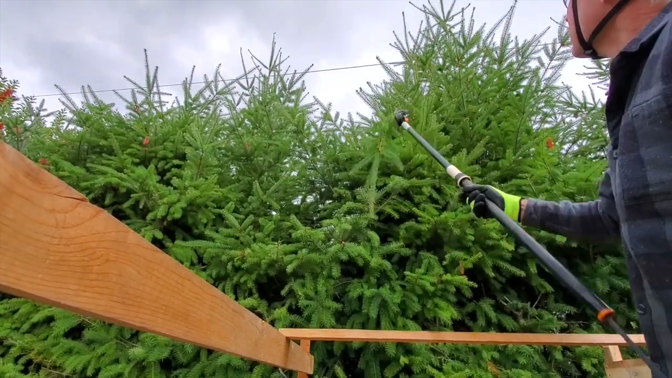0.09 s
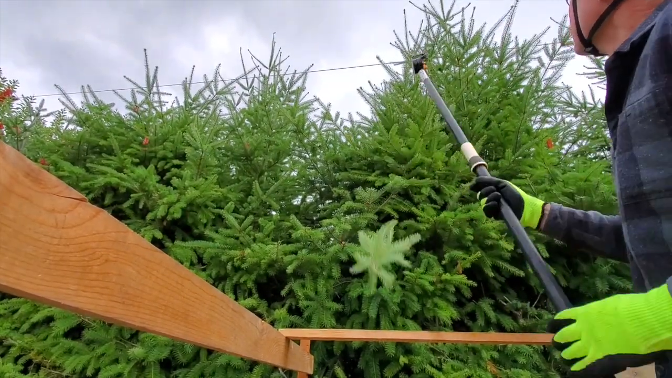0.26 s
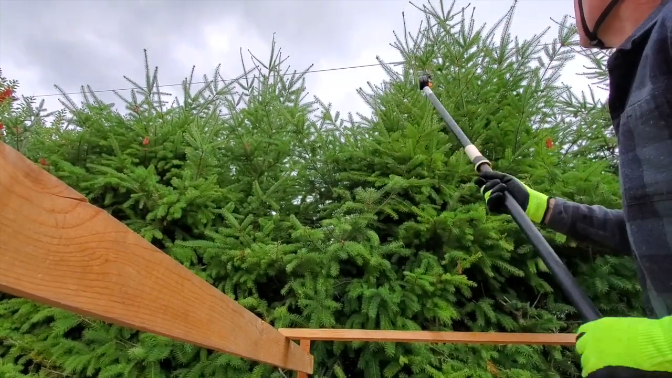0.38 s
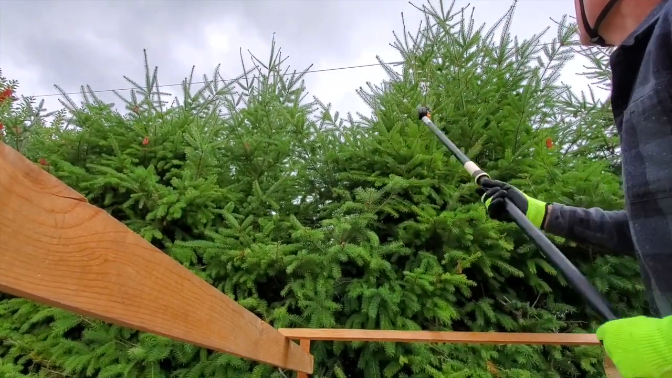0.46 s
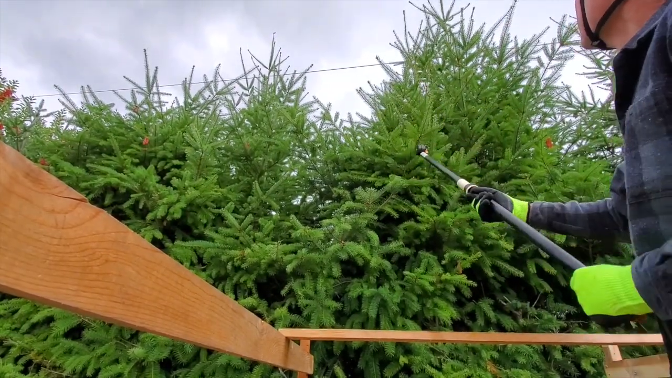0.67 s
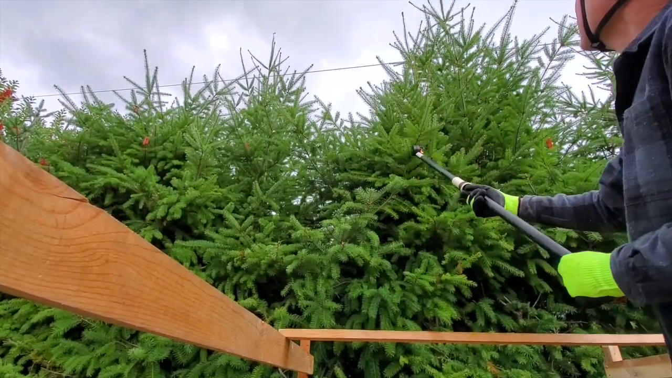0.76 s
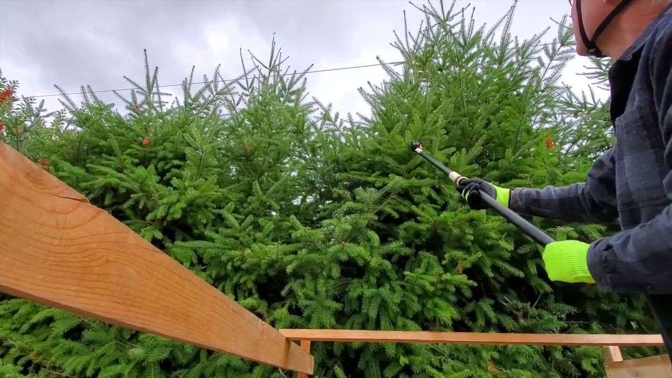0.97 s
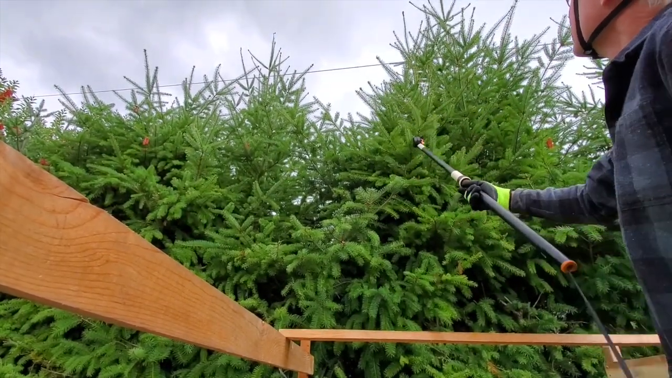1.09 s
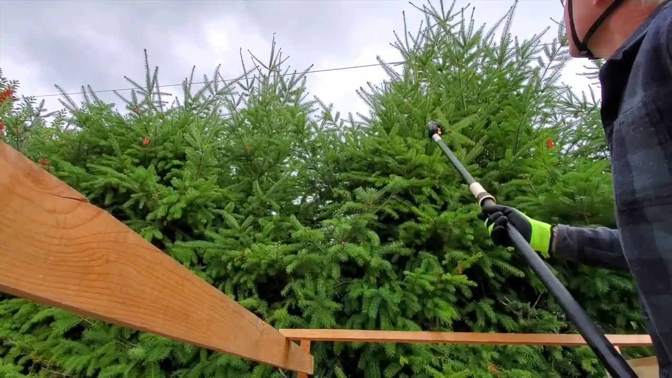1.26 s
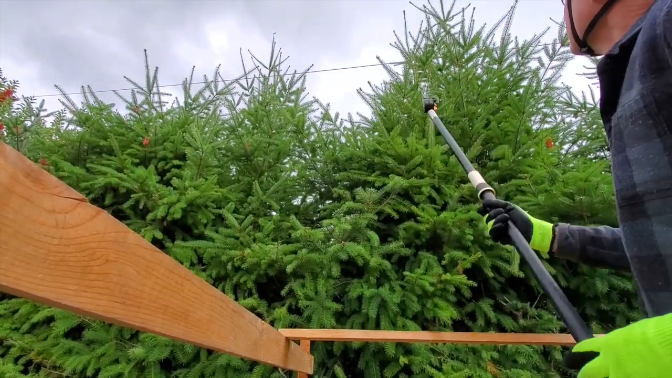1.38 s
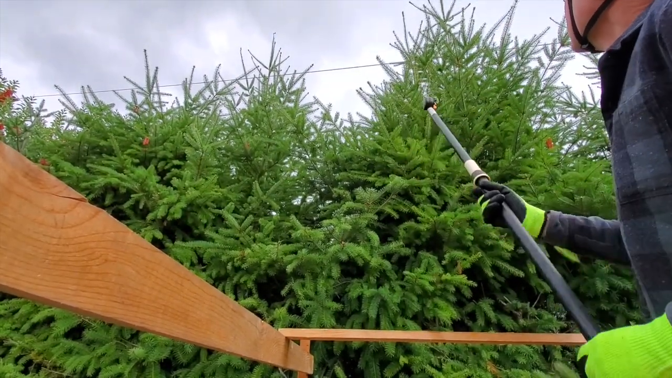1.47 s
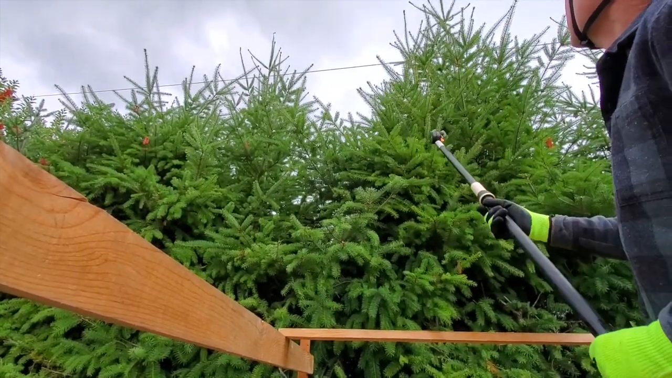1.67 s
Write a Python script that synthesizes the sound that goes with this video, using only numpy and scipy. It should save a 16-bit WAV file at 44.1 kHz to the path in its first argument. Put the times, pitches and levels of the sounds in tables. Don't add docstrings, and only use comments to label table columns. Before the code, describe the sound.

Close stereo phone pickup in a garden hedge: pruner blade cracks a twig, metal head clanks back and jingles, gloves shift, pole rattles, blade snaps again, pole butt taps a plank; quiet rumble and faint bird twitters behind.

```python
import sys
import numpy as np
from scipy import signal
from scipy.fft import rfft, irfft
from scipy.io import wavfile

SR = 44100
rng = np.random.default_rng(int(sys.argv[2]) if len(sys.argv) > 2 else 0)


def to_wav(s):
    ch = np.atleast_2d(s).T
    pcm = np.round(np.clip(ch, -1, 1) * 32767)
    wavfile.write(sys.argv[1], SR, pcm.astype(np.int16))


def elevation(decibels):
    levels = np.asarray(decibels, float)
    return 10 ** (levels / 20)


N = 74970
LEFT_LAG = 5


def in_time(rows):
    return np.interp(np.arange(N) / SR, *np.transpose(rows))


def at_hz(points, hz):
    table_hz, values = np.transpose(points)
    return np.interp(np.log(hz), np.log(table_hz), values)


def rms_one(x):
    return x / np.sqrt(np.mean(x ** 2))


def drift(rate):
    r = np.exp(-80 * np.pi * rate / SR)
    noise = rng.standard_normal(N // 40 + 2002)
    slow = signal.lfilter([1], [1, -2 * r, r * r], noise)[2000:]
    return np.interp(np.arange(N) / 40, np.arange(len(slow)), rms_one(slow))


def coloured(x, spectrum, balance=None):
    hz = np.maximum(np.arange(1025) * SR / 2048, 10)
    lean = 0 if balance is None else at_hz(balance, hz) / 2
    level = np.log(elevation(at_hz(spectrum, hz) + lean * np.array([[1], [-1]])))
    cep = irfft(level)
    cep[:, 1:1024] *= 2
    cep[:, 1025:] = 0
    kernel = irfft(np.exp(rfft(cep)))
    kernel = kernel / np.sqrt(np.mean(kernel ** 2) * 2048)
    return signal.fftconvolve(x, kernel, axes=1)[:, :N]


def sides(x, pan_db, lag=LEFT_LAG):
    left, right = np.broadcast_to(x, (2, np.shape(x)[-1]))
    return np.array([elevation(pan_db / 2) * np.roll(left, lag), elevation(-pan_db / 2) * right])


def bursts(rows, pan_db, alike=0.56):
    t, out = np.arange(N) / SR, 0
    common, left, right = rng.standard_normal((3, N))
    crackle = alike * sides(common, 0) + np.sqrt(1 - alike ** 2) * np.array([left, right])
    for s, db, decay in rows:
        age = np.maximum(t - s, 0)
        rise = 1 - np.exp(-age / (decay * 0.46))
        out = out + elevation(db - 0.5) * rise * np.exp(-age / decay)
    return sides(out, pan_db) * crackle


def struck(modes, blows, spread_db, pan_db, soft_hz, lag=LEFT_LAG):
    contact_s = 0.0015
    out = np.zeros((2, N))
    s, db = np.transpose(blows)
    for hz, level_db, t60 in modes:
        clicks = np.full((2, N), 1e-18)
        shared, left, right, late = rng.standard_normal((len(s), 4)).T
        at = ((s + contact_s * np.abs(late)) * SR).astype(int)
        chance_db = spread_db * (shared + np.array([left, right]) / 2)
        clicks[:, at] = np.sign(late) * elevation(db + level_db + chance_db)
        r, w = elevation(-60 / (t60 * SR)), 2 * np.pi * hz / SR
        out += signal.lfilter([0, np.sin(w)], [1, -2 * r * np.cos(w), r * r], clicks)
    out = signal.sosfilt(signal.butter(2, soft_hz, "high", fs=SR, output="sos"), out)
    return sides(out, pan_db, lag)


def banded(spectrum, low_hz, count, patchy_db, rate):
    # frequency in Hz, likeness of left and right from 0 to 1
    likeness = [(60, 0.18), (130, 1), (290, 1), (640, 0.88), (1500, 0.58), (3100, 0.013)]
    out, together = 0, drift(rate)
    edges = low_hz * 2 ** (np.arange(count + 1) / 2)
    white = rng.standard_normal((2, 2, N))
    for k, (low, high) in enumerate(zip(edges, edges[1:])):
        band = signal.butter(2, [low, min(high, .45 * SR)], "band", fs=SR, output="sos")
        mid, side = signal.sosfilt(band, white[k % 2])
        alike = at_hz(likeness, np.sqrt(low * high))
        stereo = np.sqrt(1 + alike) * mid + np.sqrt(1 - alike) * side * [[1], [-1]]
        out = out + elevation(patchy_db * (.5 * together + drift(rate))) * stereo
    return rms_one(coloured(out, spectrum))


def traffic():
    # frequency in Hz, level in dB per Hz
    rumble = [(25, -25.5), (58, -33), (85, -2.5), (240, -7.5), (540, -17), (1500, -23.5), (2600, -27.5),
              (4500, -41.5)]
    # frequency in Hz, width in Hz, level in dB
    engines = [(134.5, 14, -68.5), (242, 14, -69)]
    out = banded(rumble, 19.9, count=16, patchy_db=1.7, rate=5) * elevation(-61.5)
    for hz, width_hz, db in engines:
        r = np.exp(-np.pi * width_hz / SR)
        noise = rng.standard_normal((2, N + SR))
        note = signal.lfilter([1, 0, -1], [1, -2 * r * np.cos(2 * np.pi * hz / SR), r * r], noise)
        mid, side = note[:, SR:]
        out = out + elevation(db) * rms_one(mid + .5 * side * [[1], [-1]])
    return out


def needle_rustle():
    # time in seconds, level in dB
    movement = [(0, -70.5), (.12, -63), (.34, -57), (.4, -71), (.44, -60.5), (.6, -70.5), (.7, -70.5),
                (.77, -68), (.86, -78), (.96, -70.5), (.995, -58), (1.03, -65), (1.095, -57.5),
                (1.16, -69.5), (1.29, -62.5), (1.46, -67), (1.51, -58.5), (1.56, -72)]
    # frequency in Hz, level in dB per Hz
    needles = [(1470, -35), (2500, -14), (3410, -34.5), (3830, -11.5), (6550, -1), (10700, -12),
               (13600, -8.5), (16000, -28)]
    return elevation(in_time(movement)) * banded(needles, 1700, count=7, patchy_db=1.5, rate=13)


def glove_grips():
    # start in seconds, peak in dB, burst decay in seconds
    grips = [
        (.03, -53, 0.14),
        (.51, -44.5, 0.036),
        (.736, -47.5, 0.012),
        (1.03, -49, 0.088),
        (1.17, -54, 0.14),
        (1.65, -56, 0.018),
    ]
    # frequency in Hz, level in dB per Hz
    friction = [(70, -15.5), (140, 3), (350, -8), (1200, -11.5), (2300, -15.5), (3200, -38)]
    return coloured(bursts(grips, pan_db=-1.5, alike=0.87), friction)


def creak_ticks():
    # start in seconds, peak in dB, burst decay in seconds
    slips = [(.1845, -35.5, 0.0011), (.1975, -37, 0.0015), (.209, -36, 0.001), (.216, -42, 0.0014),
             (.232, -46, 0.00023), (.241, -38, 0.00091), (.249, -46, 0.00052), (.468, -40, 0.0025),
             (1.286, -46, 0.0077), (1.3295, -25, 0.00084), (1.3635, -28, 0.00089), (1.414, -23.5, 0.002),
             (1.422, -29, 0.0032), (1.524, -48, 0.0019), (1.606, -47, 0.0054)]
    # frequency in Hz, level in dB per Hz
    tick_colour = [(300, -28.5), (2500, -12.5), (3600, -9.5), (6300, -1.5), (10500, -21.5), (13000, -9),
                   (14500, -11.5), (16500, -38.5)]
    return coloured(bursts(slips, pan_db=-1.5), tick_colour)


def part_pings():
    # start in seconds, level in dB, frequency in Hz, t60 in seconds, left-right in dB
    parts = [(.185, -40, 7200, 0.014, 5), (.1855, -47, 12900, .01, -14), (.1985, -51, 7000, 0.0087, -3),
             (.2165, -52, 6500, 0.0087, -2), (.2325, -22, 6800, .015, 0), (.2405, -40, 5530, 0.01, 5),
             (.249, -39, 11400, .01, -8), (.4788, -32, 8550, .04, -6), (.4835, -44.5, 1212, 0.36, -1),
             (.4835, -44, 1249, 0.16, 2), (.4858, -45, 4660, 0.021, -9), (.494, -33, 4920, 0.027, 2),
             (.505, -46, 4480, 0.027, -1), (.533, -50, 4300, 0.027, 0), (.567, -56, 4200, 0.062, -10),
             (.572, -51.5, 5000, 0.037, 7), (1.103, -34, 6600, .012, .1), (1.1095, -28, 6460, .012, 7),
             (1.1195, -40, 6650, 0.0093, 11), (1.33, -27, 10200, .01, -3), (1.3305, -19, 5800, 0.016, 2),
             (1.339, -33, 9400, 0.013, -4), (1.3632, -31, 5270, 0.013, 13), (1.415, -29, 6780, .015, 2),
             (1.4148, -34, 12900, .02, -12), (1.4225, -32.5, 12750, 0.016, -14.5),
             (1.4225, -35.5, 9560, 0.0081, -13), (1.424, -35.5, 6160, 0.024, 10),
             (1.428, -40, 6400, 0.011, 3), (1.4744, -59, 6110, .012, -2.1), (1.4779, -56, 6400, .012, -4),
             (1.4963, -46, 6550, 0.027, 4), (1.5527, -60, 5850, .012, -1.1)]
    out, t = np.zeros((2, N + SR)), np.arange(SR // 2) / SR
    for s, db, hz, t60, pan_db in parts:
        attack = np.minimum(t * hz / 3, 1)
        ring = elevation(db - 60 * t / t60) * np.sin(2 * np.pi * hz * t) * attack
        i = int(s * SR)
        out[:, i:i + len(t)] += sides(ring, pan_db)
    return out[:, :N]


def hedge(x):
    t60_s, gap_s, level_db, spread_db = 0.13, 0.0038, -11.5, 6
    t = np.arange(SR // 4) / SR
    sizes = elevation(spread_db * np.minimum(rng.exponential(1, (2, len(t))), 4))
    echoes = rng.standard_normal((2, len(t))) * sizes * elevation(-60 * t / t60_s) * (t > gap_s)
    echoes = echoes / np.sqrt(np.sum(echoes ** 2) / 2)
    return elevation(level_db) * signal.fftconvolve(x, echoes, axes=1)[:, :N]


def hollow_pole():
    # frequency in Hz, level in dB, t60 in seconds
    tube = [(350, -6, .025), (620, -7, .02), (1030, -5, .015), (1250, -3, .02), (1620, -4, .015),
            (2050, -5, .015)]
    # time in seconds, level in dB
    jolts = [
        (0.2246, -38.5),
        (0.7377, -55.5),
        (1.1084, -38),
        (1.12, -46),
        (1.3207, -33),
        (1.415, -49.5),
    ]
    return struck(tube, jolts, 0.82, pan_db=0.0, soft_hz=255.6)


def blade_ring(peaks, s, db):
    modes = [(hz, level_db, 3.55 / width_hz) for hz, width_hz, level_db in peaks]
    return struck(modes, [(s, db)], 1.5, pan_db=-3.0, soft_hz=2460)


def twig_snaps():
    # start in seconds, peak in dB, burst decay in seconds
    breaks = [
        (0.2247, -3.5, 0.0016),
        (0.2282, -20.5, 0.0014),
        (1.3203, -4.5, 0.00094),
        (1.3233, -20.5, 0.004),
    ]
    # frequency in Hz, level in dB per Hz
    snap_colour = [(200, -28), (2400, -28), (4000, -11.5), (6500, -2.5), (8500, -15.5), (11000, -12.5),
                   (13200, -7.5), (16500, -36)]
    # frequency in Hz, left-right balance in dB
    snap_balance = [(60, -1.5), (150, 5), (380, 0), (950, -0.5), (2380, -5.5), (5980, 5), (15000, -17)]
    # frequency in Hz, width in Hz, level in dB
    first_song = [(4940, 210, -12), (5360, 310, 0.5), (6580, 299, -1), (7080, 250, -8.5), (7690, 500, -8.5),
                  (8720, 420, -6), (11500, 510, -7), (13200, 530, -2.5), (14500, 490, -18)]
    # frequency in Hz, width in Hz, level in dB
    second_song = [(3460, 200, -9.5), (4560, 190, -7.5), (6580, 300, -3), (7780, 320, -23.5),
                   (9520, 440, -1.5), (11180, 240, -2.5), (13500, 390, -10), (13900, 240, -10),
                   (15100, 280, -4)]
    crack = coloured(bursts(breaks, pan_db=-2.9, alike=0.89), snap_colour, snap_balance)
    first_ring = blade_ring(first_song, breaks[0][0], -14)
    return crack + first_ring + blade_ring(second_song, breaks[2][0], -14.5)


def birds():
    # start in seconds, length in seconds, start in Hz, end in Hz, level in dB
    whistles = [(.649, .012, 7400, 8800, -72), (.665, .018, 8300, 7200, -72), (.678, .009, 6300, 6400, -69),
                (.742, .01, 7800, 7500, -70), (.759, .009, 8700, 8000, -69), (.766, .009, 7400, 7100, -68),
                (.772, .012, 9900, 9200, -69), (.766, .012, 8400, 8600, -71), (.772, .011, 3600, 3650, -71),
                (1.618, .016, 12500, 8200, -66), (1.674, .018, 6800, 11500, -67),
                (1.578, .018, 9800, 9000, -69), (1.598, .008, 9000, 12500, -68),
                (1.514, .01, 8500, 14000, -66), (.325, .012, 8500, 10000, -68)]
    out = np.zeros(N)
    for s, length, start_hz, end_hz, db in whistles:
        n, i = int(length * 1.8 * SR), int(s * SR)
        phase = 2 * np.pi * np.cumsum(np.linspace(start_hz, end_hz, n)) / SR
        note = elevation(db) * np.hanning(n) * np.sin(phase)
        out[i:i + n] += note[:N - i]
    return sides(out * elevation(2 + 3 * drift(120)), .1)


def metal_head():
    # start in seconds, crack peak in dB, burst decay in seconds, linkage ring in dB
    clanks = [
        (0.4792, -29, 0.003, -32),
        (0.4854, -27.5, 0.0083, -36.5),
        (0.493, -27, 0.002, -63),
        (.497, -35, 0.03, -43),
        (.558, -47, 0.013, -79),
    ]
    # frequency in Hz, level in dB per Hz
    clank_colour = [(300, -16), (1200, -20), (3400, -16), (4300, 1.5), (9000, -12), (13000, -14),
                    (15200, -13), (16800, -55)]
    # frequency in Hz, level in dB, t60 in seconds
    head_modes = [(1531, -10.5, 0.24), (1870, -24, 0.33), (2430, -22, 0.38), (2740, -16.5, 0.17),
                  (3084, -33, 0.25), (4080, -10, 0.13), (3952, 1.5, 0.22), (4172, -18, 0.15),
                  (4480, -2, 0.14), (4650, 4.6, 0.2), (5430, 1, 0.11), (5380, -11, .24), (6450, -6, .16),
                  (6853, -2, 0.08)]
    cracks = coloured(bursts([row[:3] for row in clanks], pan_db=-4.0), clank_colour)
    blows = [(.480, -43), (.4858, -39.5)]
    rings = struck(head_modes, blows, 1, pan_db=-3.5, soft_hz=700, lag=2)
    linkage_hz = np.geomspace(5750, 13630, 36) * rng.uniform(.97, 1.03, 36)
    linkage = [(hz, -11, 490 / hz) for hz in linkage_hz]
    jingle = struck(linkage, [(row[0], row[3]) for row in clanks], 5, pan_db=-4.5, soft_hz=3600)
    return cracks + rings + jingle


def pole_rattle():
    # start in seconds, peak in dB, burst decay in seconds
    shakes = [
        (1.1015, -32, 0.0023),
        (1.106, -32.5, 0.0018),
        (1.108, -23, 0.0017),
        (1.1185, -28.5, 0.0037),
        (1.135, -41, 0.0014),
    ]
    # frequency in Hz, level in dB per Hz
    rattle_colour = [(150, -4), (1270, -7.5), (3700, -7), (6600, -0.5), (9500, -13.5), (13500, -9.5),
                     (16200, -26)]
    return coloured(bursts(shakes, pan_db=-0.5), rattle_colour)


def plank_knocks():
    # frequency in Hz, level in dB, t60 in seconds
    plank = [(226, -3.5, 0.05), (375, -2, 0.098), (478, 1, 0.041), (656, -3.5, .025), (810, -18, 0.06),
             (1008, -3.5, 0.043), (1167, -0.5, 0.034), (1370, -5, 0.02), (1554, -2.5, 0.01)]
    # time in seconds, level in dB
    blows = [
        (1.6058, -42.5),
        (1.608, -36.5),
        (1.6106, -58),
    ]
    return struck(plank, blows, 1, pan_db=-0.5, soft_hz=152)


def scene():
    background = traffic() + needle_rustle() + glove_grips()
    ticks = creak_ticks() + part_pings()
    snaps = twig_snaps()
    tool = hollow_pole() + metal_head() + pole_rattle()
    knocks = plank_knocks()
    echoes = hedge(tool + elevation(1) * snaps + elevation(-4.5) * ticks + elevation(4.5) * knocks)
    return background + ticks + snaps + birds() + tool + knocks + echoes


def band_limit(x):
    return signal.sosfilt(signal.butter(12, 17140, fs=SR, output="sos"), x)


def record(dry):
    x = signal.sosfilt(signal.butter(2, 45, "high", fs=SR, output="sos"), dry)
    x = signal.sosfilt(signal.cheby2(12, 70, 17200, fs=SR, output="sos"), x)
    return band_limit(x)


dry = scene()
out = record(dry)
to_wav(out)
```